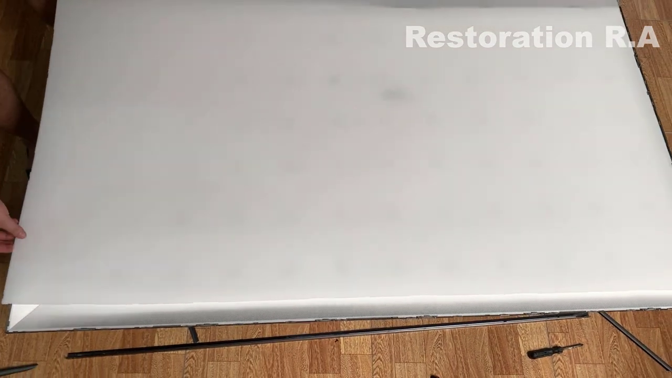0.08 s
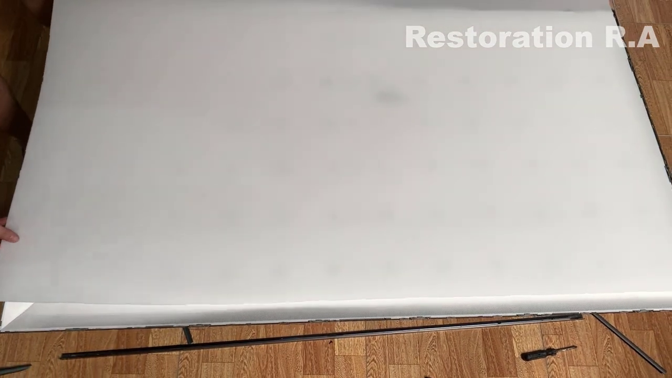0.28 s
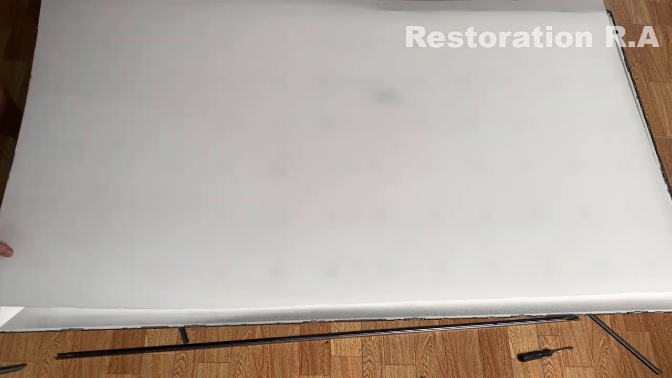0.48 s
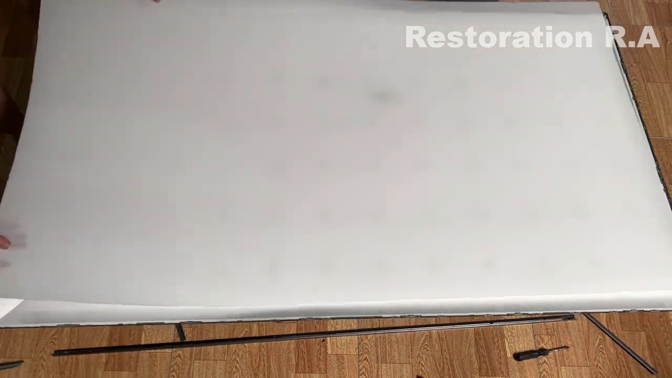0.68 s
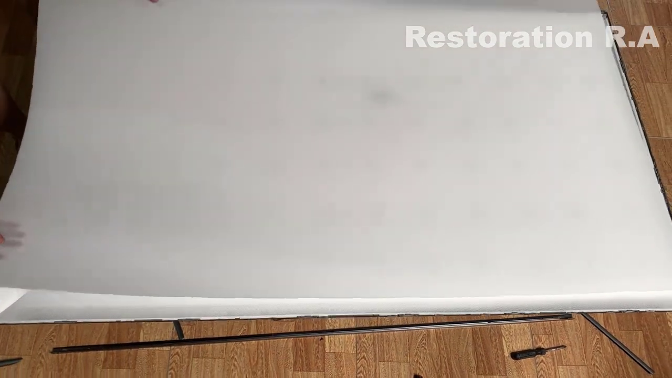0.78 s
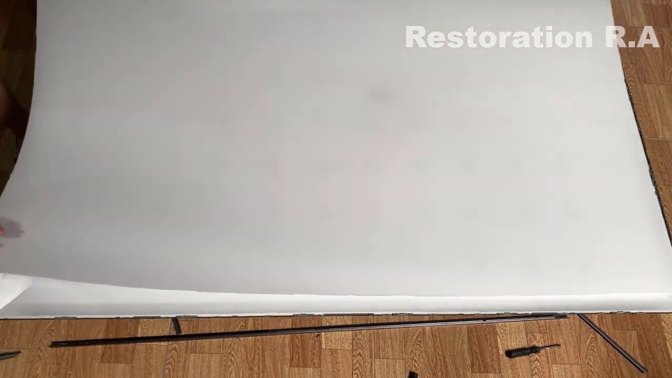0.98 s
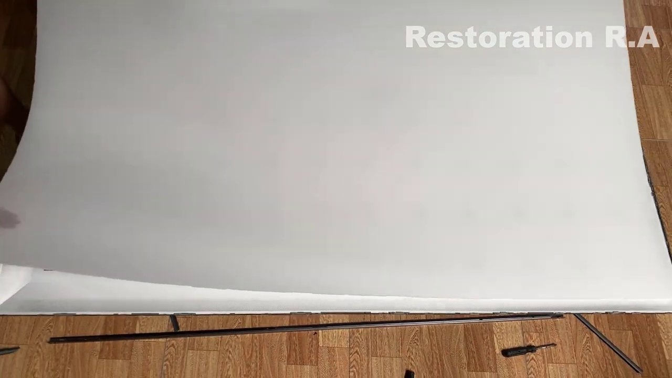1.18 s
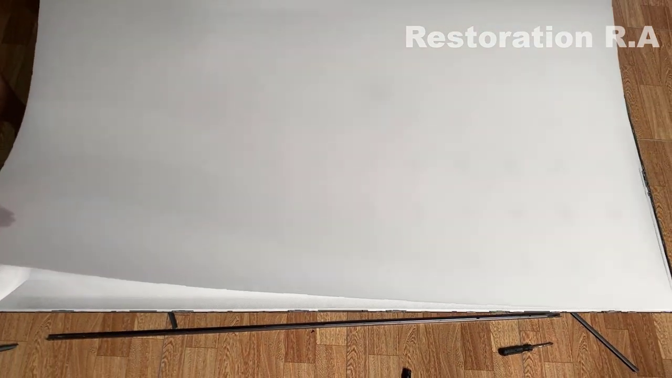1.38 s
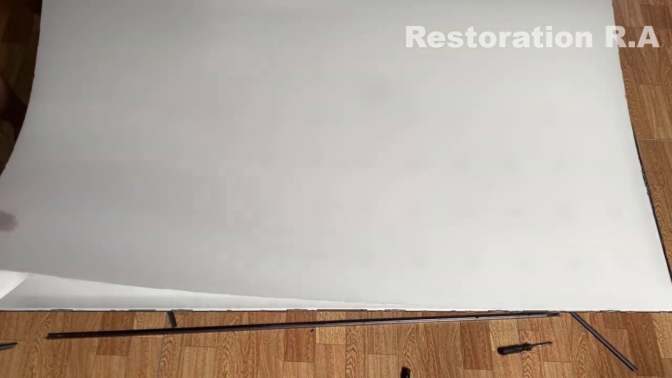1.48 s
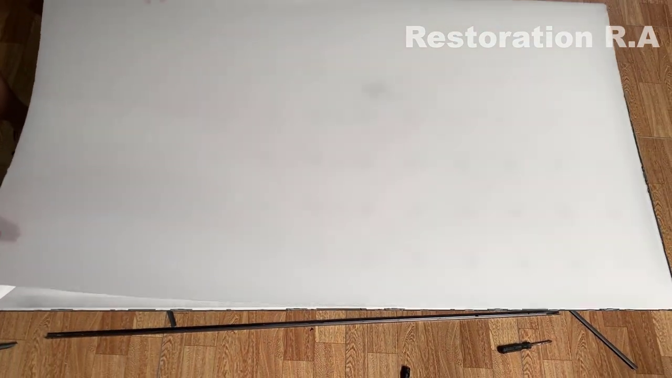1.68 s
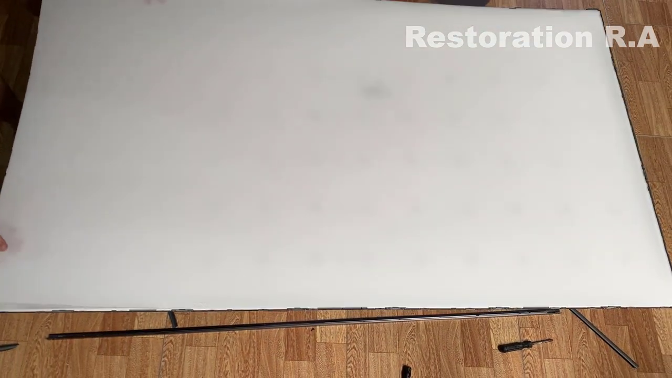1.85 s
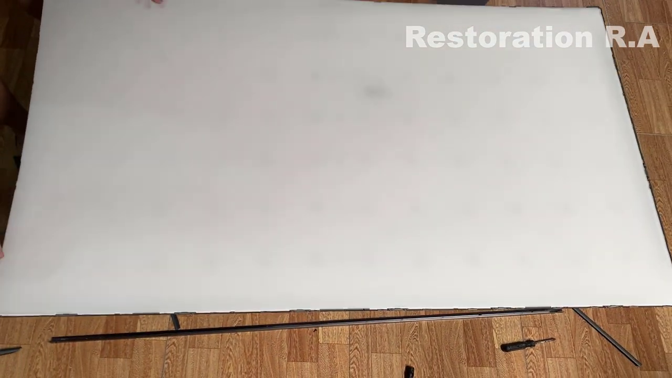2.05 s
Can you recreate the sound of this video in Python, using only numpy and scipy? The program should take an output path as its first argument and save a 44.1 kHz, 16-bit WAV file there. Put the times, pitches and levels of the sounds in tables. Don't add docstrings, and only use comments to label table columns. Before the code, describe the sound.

Big plastic sheet buckles with hollow pops and sharp snaps, its edge scraping on thin metal

```python
import sys
import numpy as np
from scipy import signal
from scipy.fft import rfft, irfft
from scipy.io import wavfile
from scipy.ndimage import uniform_filter1d, map_coordinates

SR = 44100
rng = np.random.default_rng(int(sys.argv[2]) if len(sys.argv) > 2 else 0)


def generate_wav(signal):
    frames = np.transpose(np.atleast_2d(signal))
    scaled = np.clip(frames, -1, 1) * 32767
    pcm = np.round(scaled).astype(np.int16)
    wavfile.write(sys.argv[1], SR, pcm)


def voltage_ratio(decibels):
    exponent = np.asarray(decibels, float) / 20
    return 10 ** exponent


N = 92610

# [t/s, sheet level/dB, frame ring level/dB, sizzle level/dB, rattle t60/s]
BUCKLES = [(0.201, -12, -34, -32, 0.21), (0.233, -19.5, -33, -31.5, 0.16), (0.253, -22, -23.5, -27.5, 0.22),
           (0.261, -9.5, -32, -35.5, 0.33), (0.393, -19, -46, -34.5, 0.36), (0.462, -10, -37, -25.5, 0.12),
           (0.482, -3, -52, -42, 0.05), (0.597, -8, -33, -35.5, 0.059), (0.623, -45, -28, -27, 0.16),
           (0.663, -9.5, -29.5, -41, 0.24), (0.8044, -10.5, -25, -27.5, 0.39),
           (0.892, -11, -22.5, -29, 0.06), (1.047, -54, -45.5, -42.5, 0.45),
           (1.124, -17.5, -29.5, -28.5, 0.17), (1.173, -21.5, -28.5, -31, 0.27),
           (1.194, -15, -28.5, -49, 0.43), (1.222, -12, -23, -33.5, 0.45), (1.244, -15, -28.5, -27, 0.37),
           (1.36, -28, -53, -28, 0.21), (1.374, -0.5, -48, -29, 0.2), (1.386, -6, -39.5, -48, 0.3),
           (1.801, -14.5, -52.5, -46.5, 0.21), (1.849, -43, -69, -70.5, 0.13)]
# [t/s, flexing level/dB, edge pressure on the frame level/dB, sliding level/dB]
HAND_MOTION = [(0, -66, -73.5, -68.5), (.13, -79, -73, -67.5), (.19, -55, -53.5, -54.5),
               (.37, -46.5, -59, -71), (.4, -31, -37.5, -27.5), (.5, -32, -37, -31), (.58, -42, -50.5, -49),
               (.7, -31, -90, -35), (.78, -36.5, -46.5, -55.5), (.91, -34, -42.5, -26.5),
               (1.0, -56, -62.5, -55), (1.16, -52.5, -59, -53.5), (1.31, -28, -27, -21.5),
               (1.45, -28.5, -33.5, -29.5), (1.61, -34, -37, -26.5), (1.7, -45.5, -58.5, -38),
               (1.79, -53, -62, -59.5), (2.0, -71, -90, -79.5)]
# [t/s, level/dB, f/Hz, ring t60/s]
CREASE_SNAPS = [(0.2009, -17, 1310, 0.0053), (0.2032, -22, 4200, 0.01), (0.2535, -11, 1100, 0.0084),
                (0.259, -11, 1250, 0.014), (0.2623, -26.5, 3850, 0.018), (0.2652, -13.5, 1340, 0.011),
                (0.2699, -15, 1000, 0.0062), (.273, -27, 800, 0.0098), (.276, -20.5, 3900, 0.018),
                (.298, -21.5, 620, .02), (0.3937, -13, 900, 0.0066), (0.3926, -23.5, 3850, .03),
                (0.423, -34, 3850, 0.035), (.426, -18, 880, 0.023), (0.432, -18, 3800, 0.029),
                (0.4603, -12.5, 1334, 0.0084), (.4625, -20, 660, 0.023), (0.482, -19, 1330, 0.013),
                (.483, -14, 700, 0.017), (0.481, -25, 3900, 0.024), (0.51, -24.5, 520, .03),
                (.541, -23.5, 560, 0.07), (.598, -25, 1450, 0.015), (.6632, -20, 860, 0.0097),
                (0.8058, -12, 1376, 0.012), (.8062, -20, 845, 0.035), (0.862, -17.5, 3800, 0.015),
                (.891, -23.5, 900, 0.0098), (.893, -34, 3850, 0.038), (1.0488, -58, 3780, 0.051),
                (1.068, -38, 780, 0.029), (1.1258, -11.5, 2770, 0.0079), (1.1269, -15, 1280, 0.0079),
                (1.1247, -22, 4540, 0.0087), (1.175, -21, 700, 0.036), (1.194, -13, 1280, 0.014),
                (1.223, -15.5, 720, 0.057), (1.2415, -11.5, 1240, 0.022), (1.337, -21, 600, 0.055),
                (1.3595, -11, 690, .022), (1.3715, -12, 624, 0.027), (1.383, -8.5, 700, 0.016),
                (1.3885, -8, 680, 0.016), (1.432, -13.5, 1100, 0.0087), (1.4375, -11.5, 790, 0.0096),
                (1.46, -18.5, 800, .03), (1.8043, -16.5, 1018, 0.01), (1.8046, -29, 1564, 0.013),
                (1.849, -22.5, 790, .02)]
# [start t/s, length t/s, level/dB, centre f/Hz, width f/Hz]
FRAME_RUBS = [(0.227, 0.011, -45.5, 6170, 1490), (0.386, 0.073, -38.5, 6900, 5020),
              (0.783, 0.014, -48.5, 7700, 2500), (1.043, 0.014, -36.5, 3770, 250),
              (1.131, 0.011, -31, 2280, 2200), (1.41, 0.22, -37.5, 4400, 3250),
              (1.649, 0.033, -38.5, 3770, 260), (1.801, 0.03, -37, 14350, 1800),
              (1.803, 0.057, -41, 890, 594), (1.856, 0.059, -37, 650, 500),
              (1.896, 0.018, -54.5, 10800, 1500), (2.016, 0.055, -36, 648, 350)]
# [t/s, level/dB, f/Hz, length t/s]
FLEX_THUMPS = [(0.296, -56, 71.4, 0.041), (0.466, -46.5, 177, 0.077), (0.669, -66, 68.6, .06),
               (0.717, -36.5, 235, 0.1), (0.755, -52, 74.7, .06), (1.21, -63, 65, .04),
               (1.388, -30.5, 68, 0.054), (0.85, -46.5, 140, 0.028), (1.45, -48.5, 55, 0.039),
               (1.551, -55, 111, 0.055), (1.956, -59, 119, .04)]
# [f/Hz, level/dB]
SHEET_MODES = [(446, 17), (510, 5.5), (563, 7.5), (626, 11.5), (691, -1.5), (796, -10.5), (900, 11.5),
               (978, -7.5), (1070, -29), (1209, 7.5), (1330, -4.5), (1810, -25.5), (2490, -13.5)]
# [f/Hz, level/dB]
SHEET_BED_COLOUR = [(150, -31.5), (300, -16), (450, 4), (630, 6), (1030, -8), (1400, -8.5), (2200, -13),
                    (2600, -28.5)]
# [f/Hz, width f/Hz, level/dB]
FRAME_MODES = [(3400, 120, -53), (3740, 290, -4), (3770, 28, 7.5), (3805, 210, 2), (4100, 760, -11.5)]
# [f/Hz, level/dB]
SIZZLE_COLOUR = [(2000, -9.5), (3000, -12), (4700, -26), (6500, -32), (8600, -21), (10800, 4.5),
                 (12000, -10.5), (15300, -1)]
# [f/Hz, level/dB]
AIR_COLOUR = [(18, -12), (30, -76), (252, -11.5), (345, -12.5), (721, -3.5), (1160, -22.5), (3670, -30),
              (12500, -36.5), (14500, -48.5)]
# [f/Hz, lead of the left port/radians]
PORT_LEAD = [(0, 0), (1500, 0), (3100, -3.1), (4480, -.5), (7500, 6.3), (9390, 11.5), (12300, 6.3),
             (16500, -.65)]
# [f/Hz, threshold under the moment's level/dB]
THINNING = [(2300, -68.5), (3000, -27.5), (3800, -47.5), (5200, -37), (8800, -55), (9800, -44.5)]

SIDE = np.array([[1], [-1]])


def unit(x):
    return x / np.sqrt(np.mean(x ** 2))


def noise():
    return rng.standard_normal(N)


def high_pass(x, order, hz):
    return signal.lfilter(*signal.butter(order, hz, "high", fs=SR), x)


def colour(x, table):
    hz, db = np.array(table, float).T
    f = np.log(np.fft.rfftfreq(4096, 1 / SR) + 1)
    points = np.log(np.r_[hz[0] / 2, hz, hz[-1] * 1.1])
    levels = np.r_[db[0] - 30, db, db[-1] - 40]
    cepstrum = irfft(np.log(voltage_ratio(np.interp(f, points, levels))))
    cepstrum[1:2048] *= 2
    cepstrum[2049:] = 0
    h = irfft(np.exp(rfft(cepstrum)))
    return signal.fftconvolve(x, h / np.sqrt(np.sum(h ** 2)))[:N]


def ring(x, modes):
    t = np.arange(8192)[:, None] / SR
    hz, width, db = np.array(modes, float).T
    decay = np.exp(-np.pi * width * t)
    h = (voltage_ratio(db) * width * decay * np.sin(2 * np.pi * hz * t)).sum(axis=1)
    return signal.fftconvolve(x, h / np.sqrt(np.sum(h ** 2)))[:N]


def walk(rate):
    return unit(uniform_filter1d(noise(), max(int(SR / rate), 1)))


def bent(drive, modes, bend):
    even = np.arange(N)
    bend_rate_hz = 9
    clock = np.cumsum(np.clip(1 + bend * walk(bend_rate_hz), .8, 1.2))
    clock = clock * (N - 1) / clock[-1]
    warped = map_coordinates(drive, [np.interp(even, clock, even)])
    return map_coordinates(ring(warped, modes), [clock], mode="nearest")


def grains():
    spread_db = 2.5
    return unit(noise() * voltage_ratio(spread_db * rng.exponential(size=N)))


def motion(axis, trim_db, tick_db=4.5):
    flutter_db, rattle_db, tick_s = 2.5, -9.5, .0012
    t, hand = np.arange(N) / SR, np.array(HAND_MOTION)
    hand_db = np.interp(t, hand[:, 0], hand[:, axis])
    power = voltage_ratio(hand_db + flutter_db * walk(40)) ** 2
    ticks = np.zeros(N)
    for row in BUCKLES:
        start, t60 = row[0], max(row[4], .01)
        age = np.maximum(t - start, 0)
        size = voltage_ratio(row[axis] + trim_db) * (t >= start)
        power = power + (size * voltage_ratio(rattle_db - 60 * age / t60)) ** 2
        ticks = ticks + size * voltage_ratio(tick_db) * np.exp(-age / tick_s)
    return np.sqrt(power) * grains() + ticks * noise()


def sheet():
    modes_db, damping, bend = -3, 0.048, 0.059
    drive = motion(axis=1, trim_db=-9, tick_db=-6)
    modes = [(hz, hz * damping, db) for hz, db in SHEET_MODES]
    return voltage_ratio(modes_db) * bent(drive, modes, bend) + colour(drive, SHEET_BED_COLOUR)


def snaps():
    t, out = np.arange(N) / SR, 0
    for start, db, hz, t60 in CREASE_SNAPS:
        age = np.maximum(t - start, 0)
        phase = 2 * np.pi * hz * age * (1 + 0.028 * walk(300))
        out = out + voltage_ratio(db - 60 * age / t60) * np.sin(phase)
    return out


def frame():
    return bent(motion(axis=2, trim_db=1.5), FRAME_MODES, bend=.025)


def rubs():
    edge_s = 0.018
    t, out = np.arange(N) / SR, 0
    for start, length, db, hz, width in FRAME_RUBS:
        rise = edge_s * 1000 / hz
        swell = np.clip((t - start) / rise / 3, 0, 1)
        fade = np.exp(-np.maximum(t - start - length, 0) / edge_s)
        band = [(hz, width, 0)]
        friction = unit(ring(ring(grains(), band), band))
        out = out + voltage_ratio(db) * swell * fade * friction
    return out


def sizzle(trim_db):
    return colour(motion(axis=3, trim_db=trim_db), SIZZLE_COLOUR)


def thumps():
    t, out = np.arange(N) / SR, 0
    for centre, db, hz, length in FLEX_THUMPS:
        puff = ring(noise(), [(hz, hz * 0.58, 0)])
        out = out + voltage_ratio(db) * puff * np.exp(-((t - centre) / length) ** 2 * 2)
    return out


def at_ports(near):
    left_db = -1.17
    lead = np.interp(np.fft.rfftfreq(N, 1 / SR), *np.array(PORT_LEAD).T) / 2
    return irfft(rfft(near) * np.exp(1j * lead * SIDE), N) * voltage_ratio(left_db * SIDE)


def room(x):
    t60_s, level_db, top_hz = 0.15, -2, 9330
    t = np.arange(SR // 2) / SR
    tail = rng.standard_normal((2, len(t))) * voltage_ratio(-60 * t / t60_s) * (t > .002)
    tail = signal.lfilter(*signal.butter(4, top_hz, fs=SR), tail)
    tail = tail / np.sqrt(np.sum(tail ** 2) / 2)
    return voltage_ratio(level_db) * signal.fftconvolve(high_pass(x, 1, 900)[None], tail, axes=1)[:, :N]


def air():
    mid, apart = colour(noise(), AIR_COLOUR), colour(noise(), AIR_COLOUR)
    return voltage_ratio(-61.5) * (mid + 0.96 * apart * SIDE)


def rumble():
    modes = [(68, 60, 0), (170, 120, -6)]
    hum, apart = ring(noise(), modes), ring(noise(), modes)
    return voltage_ratio(-59 + 1.8 * walk(2)) * (hum + 0.4 * apart * SIDE)


def scene():
    flicks = snaps()
    body = high_pass(sheet() + flicks + rubs(), 3, 287)
    near = body + frame() + sizzle(trim_db=7) + thumps()
    spread = 0.21 * sizzle(trim_db=1.5) + 0.092 * thumps()
    echoes = room(near - 0.44 * flicks)
    return at_ports(near) + spread * SIDE + echoes + air() + rumble()


def thinned(x):
    patchy_db, follows_own, quiet_db = 8.5, 0.37, -103
    cancel_hz, cancel_width_hz, cancel_db = 14180, 260, -5
    pair = np.array([[1, 0.88], [1, -0.91]])
    f, _, z = signal.stft(pair @ x / 2, SR, nperseg=2048)
    f = f[:, None]
    loud = np.sqrt((np.abs(z) ** 2).sum(axis=(0, 1)))
    own = uniform_filter1d(np.abs(z).sum(axis=0), size=40, axis=0) + 1e-12
    patch = np.repeat(rng.standard_normal((2, 86, z.shape[2])), 12, axis=1)[:, :len(f)]
    hz, db = np.array(THINNING).T
    under_db = np.interp(np.log(f + 1), np.log(hz), db)
    limit = (loud ** 1.44 * voltage_ratio(under_db + 2)) ** (1 - follows_own) * own ** follows_own
    limit = limit * voltage_ratio(patchy_db * patch)
    limit = limit * (np.roll(loud, -1) < 2 * np.roll(loud, 1))
    limit = np.maximum(limit, voltage_ratio(quiet_db) * (f > 13400))
    cancel = np.exp(-((f - cancel_hz) / cancel_width_hz) ** 4)
    limit[0] = np.maximum(limit[0], own * voltage_ratio(cancel_db) * cancel)
    return pair @ signal.istft(z * (np.abs(z) > limit), SR, nperseg=2048)[1][:, :N]


def low_pass(x):
    return signal.sosfilt(signal.butter(12, 16950, fs=SR, output="sos"), x)


def record(dry):
    heard = high_pass(dry, 2, 73)
    rounded = np.tanh(1.5 * heard) / 1.5
    top_cut = signal.ellip(6, .5, 24, 15680, fs=SR, output="sos")
    finished = thinned(signal.sosfilt(top_cut, rounded))
    return low_pass(finished)


dry = scene()
out = record(dry)
generate_wav(out)
```